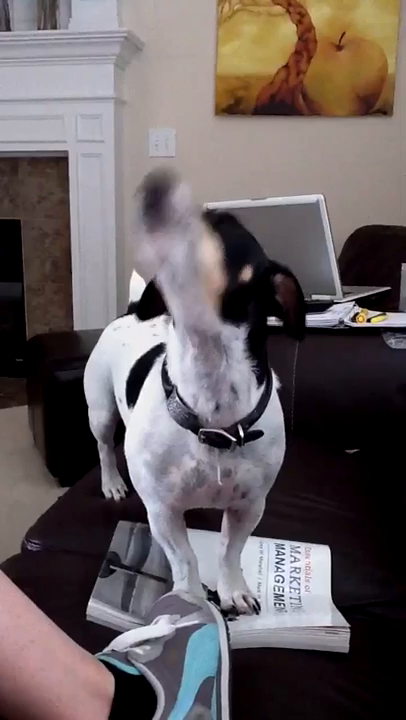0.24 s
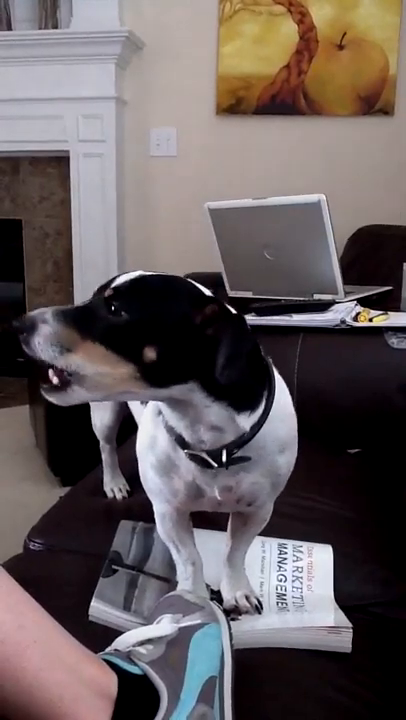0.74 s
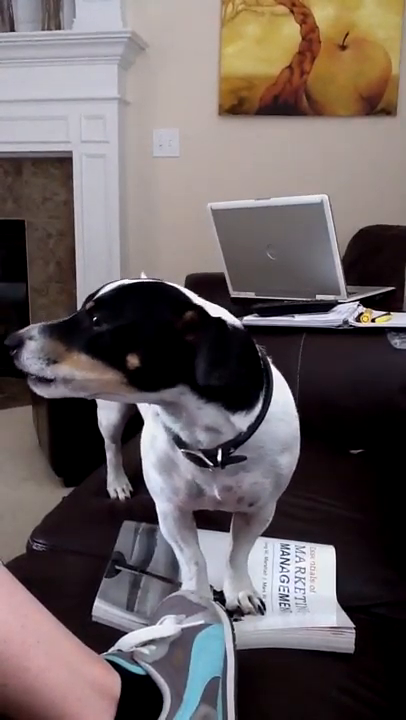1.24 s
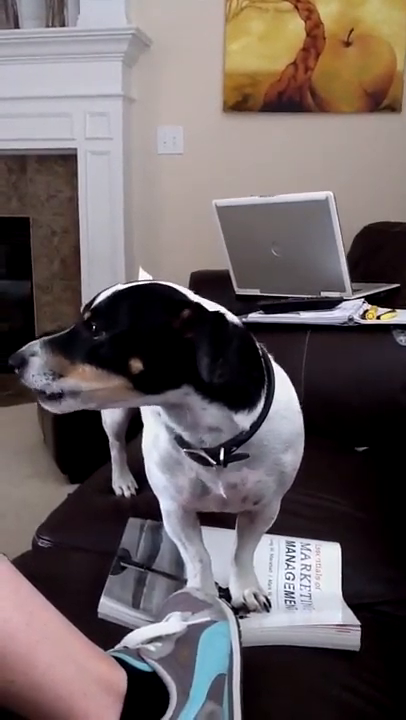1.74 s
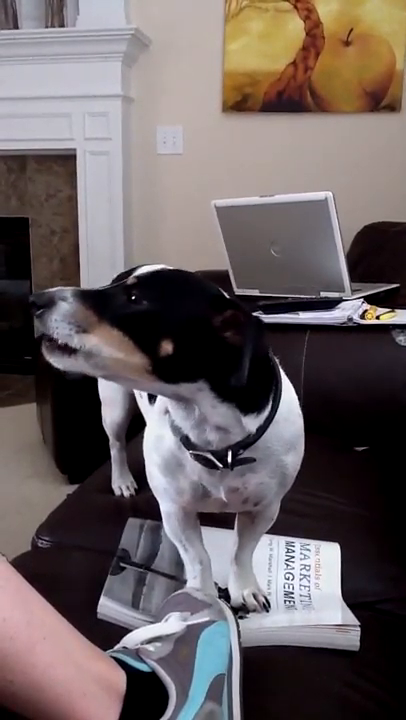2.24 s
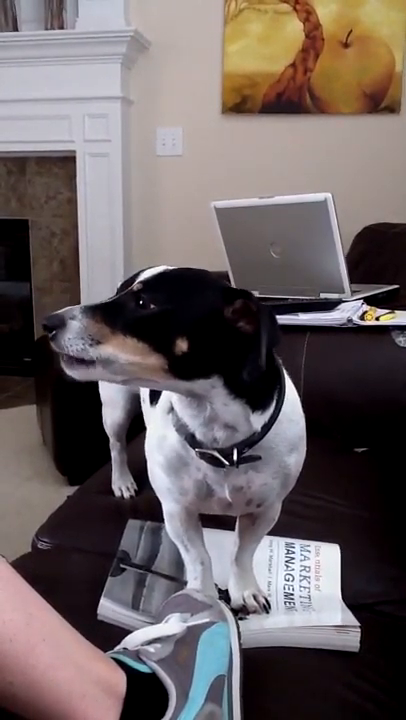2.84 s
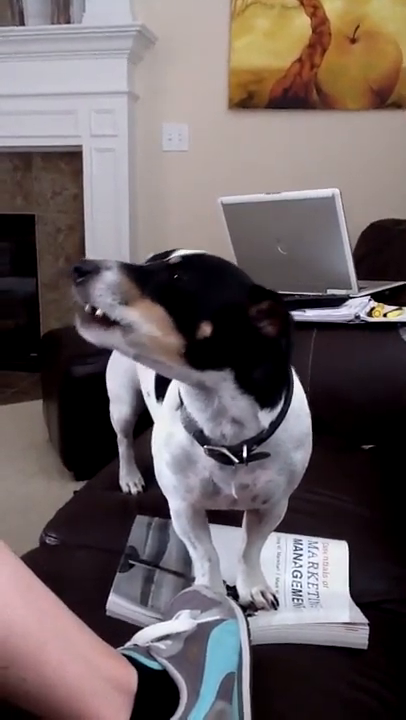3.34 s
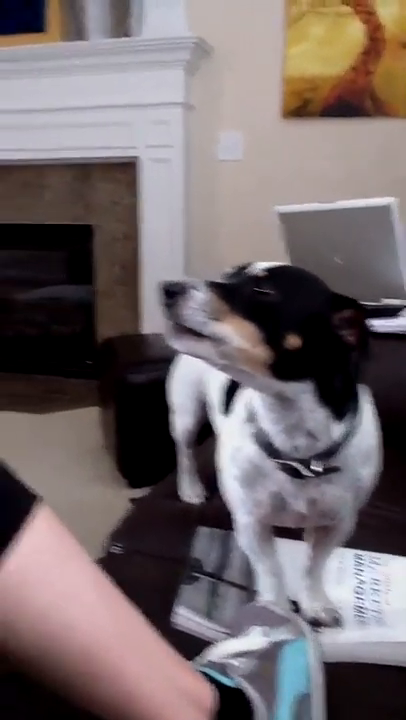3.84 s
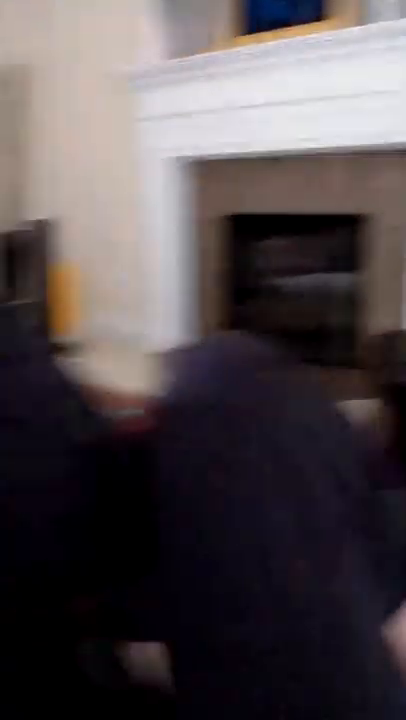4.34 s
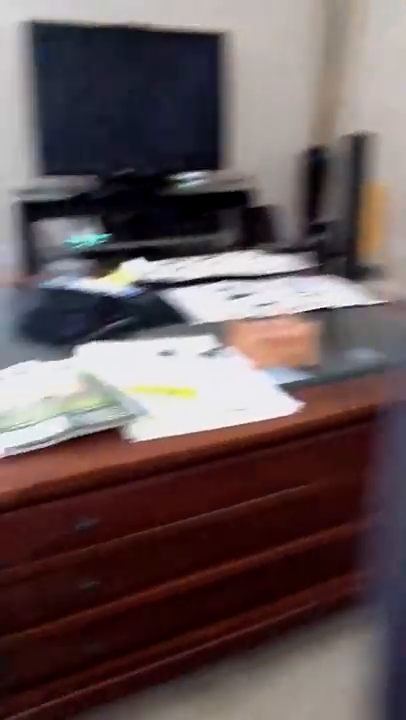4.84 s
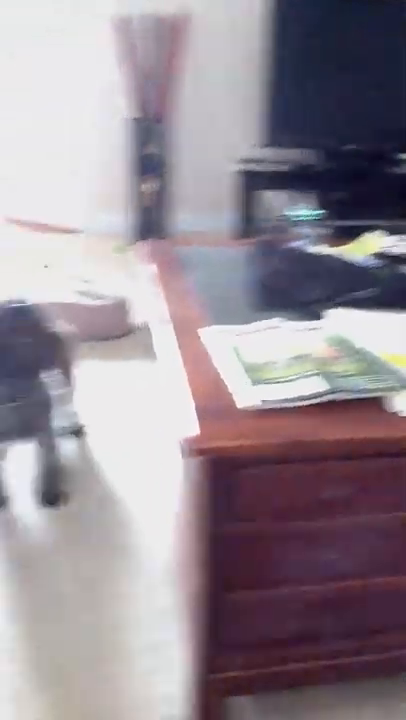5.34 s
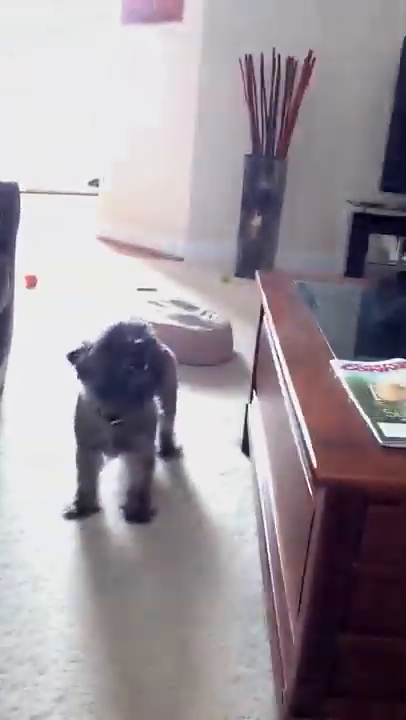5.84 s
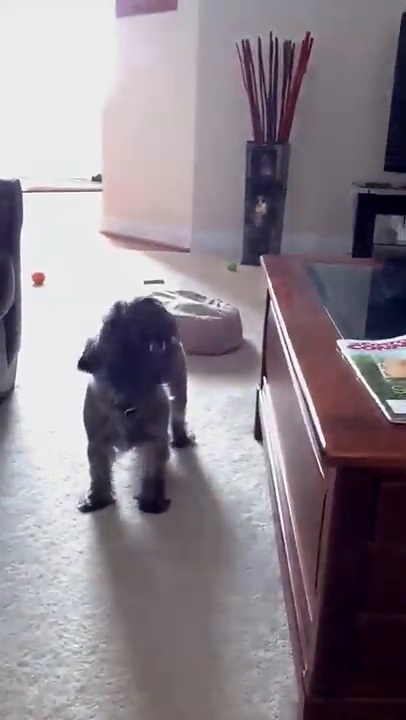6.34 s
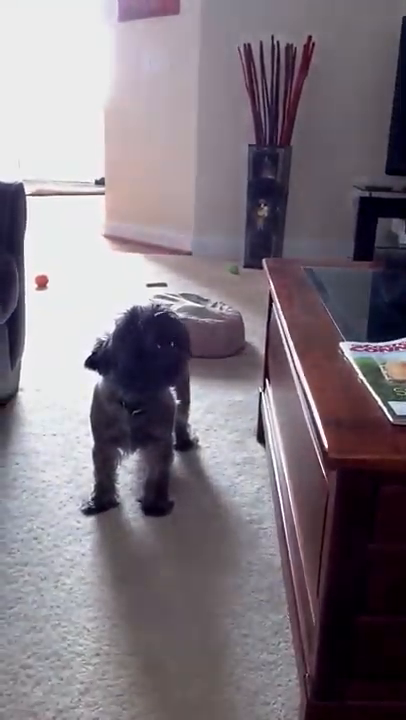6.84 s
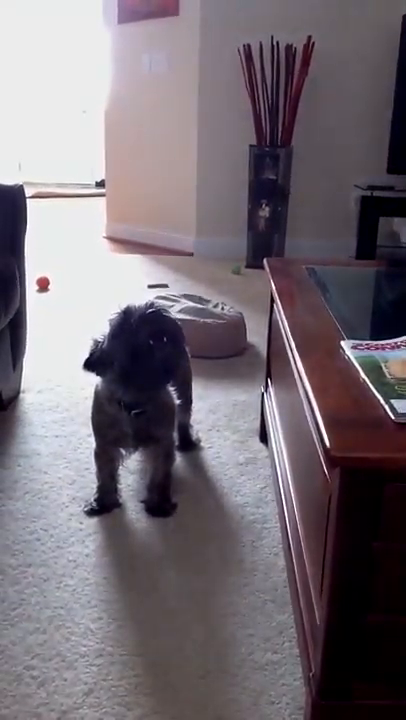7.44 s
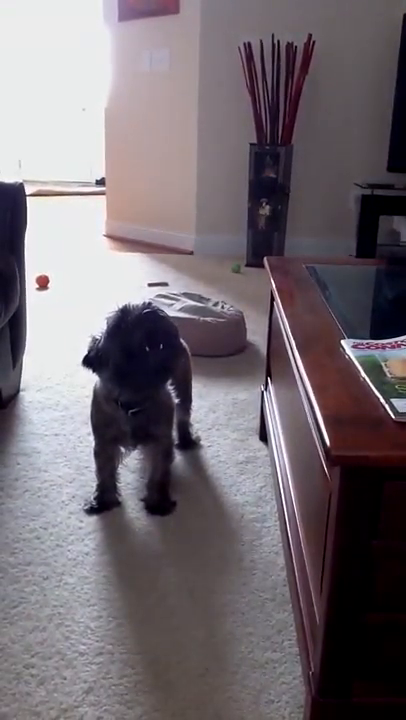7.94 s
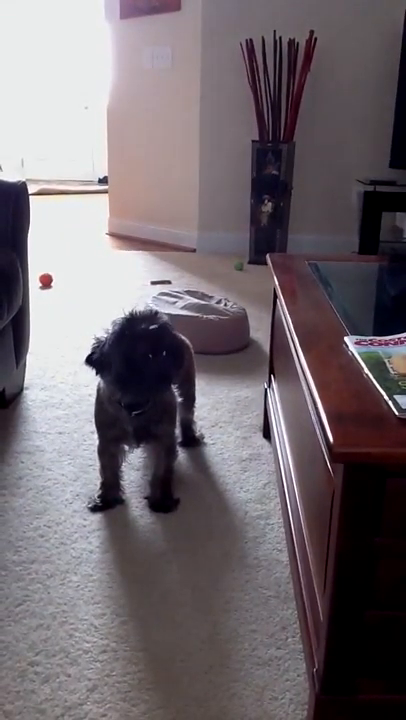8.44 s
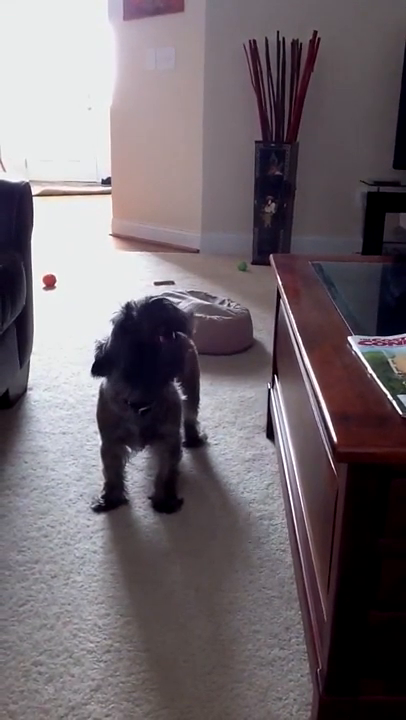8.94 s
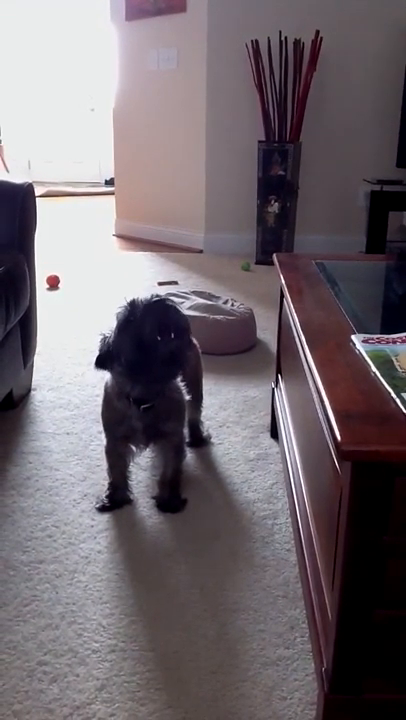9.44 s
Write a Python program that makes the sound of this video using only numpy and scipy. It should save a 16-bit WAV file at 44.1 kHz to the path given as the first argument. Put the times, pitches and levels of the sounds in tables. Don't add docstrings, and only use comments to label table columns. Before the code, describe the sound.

In a carpeted living room, two small dogs vocalise together, very close and loud. One repeatedly gives a tight high yelp that breaks into a falling, wavering howl. The other squeals into hoarse barks and thin whines, then fires off quick, evenly spaced yips. A short room echo and a faint low hum sit behind them, and the overloaded microphone flattens the peaks.

```python
import sys
import numpy as np
from scipy import signal
from scipy.fft import rfft, irfft, next_fast_len
from scipy.io import wavfile
from scipy.ndimage import uniform_filter1d, minimum_filter1d

SR = 44100
rng = np.random.default_rng(int(sys.argv[2]) if len(sys.argv) > 2 else 0)


def decibels_to_gain(level_db):
    exponent = np.asarray(level_db, float) / 20
    return 10 ** exponent


def generate_wav(sig):
    pcm = np.round(np.clip(np.atleast_2d(sig).T, -1, 1) * 32767).astype(np.int16)
    wavfile.write(sys.argv[1], SR, pcm)


N = 426436

FLOOR_DB = -51.5
ROOM_T60_S, TREBLE_T60_S, ROOM_DB = 0.64, 0.51, -7
# pitch in Hz, level in dB, t60 in seconds.
ROOM_MODES = [(977, -17, 0.59), (750, -4, 0.15)]
CUTOFF_HZ = 15400

# frequency in Hz, weight in dB.
HOWL_THROAT = [(400, 3), (1270, 3), (1920, -0.1), (2700, -7), (3850, -22.5), (4500, -34), (6800, -38),
               (7800, -33.5), (9200, -43.5), (10600, -32.5), (15300, -74)]
YIP_THROAT = [(400, 92), (1550, -4), (2450, -1), (3200, -25.5), (4300, -30.5), (5800, -35), (6900, -24.5),
              (8100, -12), (11100, -28.5), (13100, -29), (15300, -31)]
BARK_THROAT = [(400, 30), (1500, 0), (2400, -8), (3200, -12), (4300, -24), (5800, -42), (8000, -37),
               (15300, -50)]
# frequency in Hz, level in dB per Hz.
HOWL_AIR = [(60, -80), (230, -27), (420, -34), (700, -14.5), (1150, -12.5), (1500, -22), (2030, -31.5),
            (3020, -18.5), (4600, -29.5), (7780, -31.5), (15300, -52.5)]
# frequency in Hz, level in dB per Hz.
BARK_AIR = [(230, -37.5), (420, -74), (800, -16), (1200, -4), (1650, -5.5), (2300, -11), (3200, -20.5),
            (5000, -45), (15300, -35.5)]
BLUR_FROM_HZ, BLUR_FULL_HZ = 3500, 4800

# start, loudest moment and end in seconds, pitch in Hz, level in dB.
WHINES = [(0.528, 0.555, 0.65, 689.4, -21.5), (1.765, 1.794, 2.04, 680, -18),
          (2.168, 2.254, 2.39, 647, -17), (2.915, 2.96, 3.29, 698.6, -17), (4.064, 4.316, 4.57, 666, -26.5),
          (5.601, 5.644, 5.76, 697, -16.5), (6.566, 6.665, 6.72, 657, -17.5),
          (9.131, 9.212, 9.3, 698.5, -16.5), (9.64, 9.659, 9.67, 582, -14.5)]
WHINE_SWELL_DB, WHINE_FADE_DB, WHINE_OPENING_DB = 8.5, 10, -14
WHINE_SAG = 0.041

# start and length in seconds, from Hz, to Hz, level in dB.
SQUEALS = [(0.178, 0.061, 704, 847, -12), (1.454, 0.035, 696, 823, -12.5), (2.526, 0.071, 714, 1096, -6),
           (3.698, 0.061, 865, 1153, -3.5), (6.239, .039, 924, 1109, -5), (8.794, .042, 923, 1133, -4.5)]
SQUEAL_SWELL_DB_PER_S, SQUEAL_ABRUPT_S, SQUEAL_ABOVE_DB = 330, .033, -17
# length in seconds, pitch in Hz, level in dB, roughness from 0 to 1,
# level in dB of the glide after it.
RASPS = [(0.085, 1190, -9.5, 0.26, -12), (.085, 1120, -13.5, 0.6, -18), (.085, 1040, -14, 0.33, -12.5),
         (.105, 755, -9.5, 0.38, -20.5), (0.15, 765, -10, 0.34, -26.5), (.1, 770, -8.5, 0.36, -26.5)]
RASP_ARCH, HIGH_RASP_ARCH = .15, .04
MOUTH_HZ, BELOW_DB, ABOVE_DB = 900, 13, -33
GLIDE_S, GLIDE_SETTLES_S, GLIDE_FROM_HZ, GLIDE_TO_HZ, GLIDE_FADE_DB = .19, 0.065, 825, 660, 9

# loudest moment in seconds, top pitch in Hz, level in dB, rise in seconds, mouth opening in dB.
YIPS = [(2.09, 748, -16.5, 0.087, -11.5), (4.654, 764.6, -15, 0.1, -7.5), (4.88, 773.3, -9.5, 0.089, -6),
        (5.101, 767.8, -8, 0.09, -8), (5.312, 789, -3, 0.077, -9.5), (5.527, 747.5, -10.5, 0.086, -18.5),
        (6.906, 751, -12.5, 0.071, -11), (7.124, 775, -9, 0.07, -14), (7.326, 761, -9, 0.079, -11.5),
        (7.527, 771.5, -9.5, 0.084, -10), (7.746, 762.4, -9, 0.091, -10), (7.945, 731, -12.5, 0.082, -11),
        (8.185, 762, -9, 0.055, -14.5), (9.475, 803, -8, 0.069, -8.5)]
HOARSE_YIPS = [(5.8, 807.4, -10.5, 0.075, -11.5), (8.42, 798.5, -11.5, 0.071, -9.5)]

# start in seconds, top pitch in Hz, level in dB,
# strain from 0 to 1, mouth opening of the fall after it (overtones over the lowest tone) in dB.
YELPS = [(0.635, 1143, -6.5, 0.13, 9.5), (1.829, 967.6, -4.5, 0.11, 12), (3.012, 1083, -4.5, 0.1, 12),
         (4.149, 1058, -7.5, 0.19, 19.5), (5.522, 953.4, -6.5, 0.11, 12), (6.655, 1011, -7, 0.1, 13),
         (7.923, 1086, -9.5, 0.07, 13), (9.198, 1004, -8.5, 0.07, 13.5)]
# share of its length, level in dB,
# mouth opening in dB.
YELP_ARC = [
    (0, -10, 5),
    (.15, -3, 4),
    (.31, 0, -13),
    (.56, -4, -12),
    (.87, 1, -20),
]
YELP_START_HZ, YELP_CLIMB_HZ, YELP_SAG_HZ, YELP_KNEE_HZ = 614, 767.8, 909, 964
STRAIN_LASTS, STEADY_STRAIN = .7, .025
# time in seconds, pitch in Hz, level in dB.
EARLY_FALLS = [
    [(0.0, 549.5, -19), (0.165, 516.6, -33), (0.237, 552, -31)],
    [(0.716, 724, -35), (0.758, 660, -18.5), (0.842, 657, -13.5), (1.02, 615.4, -14.5),
     (1.262, 572.7, -15.5), (1.421, 519.4, -21), (1.499, 517, -29)],
    [(1.913, 743.4, -38), (1.949, 647.5, -17.5), (2.024, 634, -16), (2.159, 608, -15.5),
     (2.231, 587.5, -16.5), (2.393, 516.3, -17), (2.456, 439, -22), (2.597, 510, -17.5)],
    [(3.101, 729, -22.5), (3.146, 624, -20), (3.25, 604.6, -16), (3.33, 589.2, -15), (3.536, 519.3, -18),
     (3.575, 517.5, -18), (3.662, 459, -22), (3.746, 455, -23.5)],
    [(4.236, 686, -20), (4.263, 637, -14), (4.315, 408.3, -36.5), (4.48, 462, -25), (4.69, 457, -25),
     (4.85, 466, -25), (5.03, 476.7, -24.5), (5.265, 494, -28.5)],
]
LATE_FALLS = [
    [(5.645, 770, -18.5), (5.747, 658, -19.5), (5.858, 580, -17.5), (5.99, 620, -23), (6.035, 573, -16.5),
     (6.17, 552, -19.5), (6.257, 523, -19.5)],
    [(6.747, 777, -17.5), (6.78, 729, -15.5), (6.933, 676, -18), (7.059, 583, -21), (7.236, 538, -21.5),
     (7.359, 479.4, -24), (7.539, 447, -32.5), (7.599, 411, -42)],
    [(8.031, 736, -17.5), (8.127, 634, -20.5), (8.229, 645, -18), (8.373, 597.7, -18), (8.514, 550, -22),
     (8.649, 496, -28.5), (8.757, 488, -29.5)],
    [(9.279, 699, -19), (9.336, 626, -19.5), (9.411, 634.7, -14.5), (9.582, 527, -28), (9.663, 570.6, -25)],
]
FIRST_OPENING_DB = -15
# time in seconds, pitch rise in %, width in seconds.
PUSHES = [(0.801, 8.8, 0.015), (0.873, 2.8, 0.02), (1.126, 8.6, .06), (1.338, 6, .03), (2.057, 6.1, .02),
          (2.282, 8.2, .035), (3.205, 4.9, .015), (3.295, 5, .015), (3.421, 9.3, .05), (3.603, 9.9, .018),
          (4.434, 26.2, .03), (4.533, 9.8, .022), (4.609, 4.55, .04), (4.739, 12.2, .022), (4.811, 6, .022),
          (4.901, 22, .022), (4.953, 18, .035), (5.101, 3.6, .03), (5.205, 10, .025), (8.417, 13.8, .025),
          (8.569, 17, .03), (8.699, 11.6, .025), (9.638, 18, .028)]
PUSH_DB, PUSH_CLOSES_DB = 0.4844, 0.5


def rms_one(x):
    return x / np.sqrt(np.mean(x ** 2) + 1e-20)


def at_hz(points, hz):
    points = np.array(points)
    return np.interp(np.log(hz), np.log(points[:, 0]), points[:, 1])


def drift(size, rate_hz):
    r = np.exp(-2 * np.pi * rate_hz / SR)
    wander = signal.lfilter([1], [1, -2 * r, r * r], rng.standard_normal(size + 4000))
    return rms_one(wander[4000:])


def coloured(size, spectrum):
    hz = np.maximum(np.fft.rfftfreq(size, 1 / SR), 20)
    white = rfft(rng.standard_normal(size))
    return rms_one(irfft(white * decibels_to_gain(at_hz(spectrum, hz)), size))


def hum(size):
    spectrum = [(30, -56), (150, -8.0), (400, -23), (3000, -16), (15000, -35)]
    return decibels_to_gain(FLOOR_DB) * coloured(size, spectrum)[:N]


def room(x):
    t = np.arange(int(.8 * SR)) / SR
    noise = rng.standard_normal(len(t)) * np.clip((t - .006) / 0.0069, 0, 1)
    low = signal.sosfilt(signal.butter(2, 3500.0, fs=SR, output="sos"), noise)
    tail = low * decibels_to_gain(-60 * t / ROOM_T60_S) + (noise - low) * decibels_to_gain(-60 * t / TREBLE_T60_S)
    tail /= np.sqrt(np.sum(tail ** 2))
    for hz, level_db, t60 in ROOM_MODES:
        tail += decibels_to_gain(level_db - 38.0 - 60 * t / t60) * np.sin(2 * np.pi * hz * t)
    return decibels_to_gain(ROOM_DB) * signal.fftconvolve(x, tail)[:N]


def call(rows, throat, air, tremor, strain_db=0, blur=0):
    s, hz, level_db, open_db, rough = np.transpose(rows)
    start, stop = int(s[0] * SR), min(int((s[-1] + 0.031) * SR), N)
    t, size = np.arange(start, stop) / SR, stop - start
    rough = np.clip(rough, 0, 1)
    hz, level_db, open_db, rough = (np.interp(t, s, c) for c in (hz, level_db, open_db, rough))
    hz = uniform_filter1d(hz, size=300, mode="nearest")
    hz = hz * (1 + tremor * drift(size, 13.93) + 0.06 * rough * drift(size, 179.0))
    phase = 2 * np.pi * (np.cumsum(hz) / SR + rng.random())

    k = np.arange(2, 32)[:, None]
    overtone_hz = k * hz[::32]
    brighter_db = strain_db * rough[::32] * np.clip(np.log2(overtone_hz / 1600), 0, 1.7)
    weights = decibels_to_gain(at_hz(throat, overtone_hz) + brighter_db) * (overtone_hz < CUTOFF_HZ)
    weights /= np.sqrt(np.sum(weights[:3] ** 2, axis=0))
    weights *= decibels_to_gain(np.minimum(1.5 + 0.4 * k, 5.0) * [drift(len(w), 340.0) for w in weights])
    torn = blur * np.clip((overtone_hz - BLUR_FROM_HZ) / (BLUR_FULL_HZ - BLUR_FROM_HZ), 0, 1)
    weights *= 1 - torn + torn * [drift(len(w), 2700.0) for w in weights]
    overtones = sum(np.repeat(w, 32)[:size] * np.sin(n * phase + n * n * .4)
                    for n, w in zip(k[:, 0], weights))

    opening = decibels_to_gain(open_db)
    tone = np.sqrt(2) * (np.sin(phase) + opening * overtones) / np.sqrt(1 + opening ** 2)
    tone *= 1 + 0.71 * rough ** 2 * np.sin(phase / 2) + (0.075 + 0.8 * rough) * drift(size, 45.0)
    puffs = air[start:stop] * (1 + 0.09 * np.sin(phase))
    fade_in = np.clip((t - s[0]) / 0.0032, 0, 1)
    fade_out = np.clip(1 - (t - s[-1]) / 0.022, 0, 1) ** 2
    voice = np.sqrt(1 - rough / 2) * tone + 2.5 * rough * puffs
    out = np.zeros(N)
    out[start:stop] = decibels_to_gain(level_db) * (fade_in * fade_out) * voice
    return out


def whine(start, loudest, end, hz, level_db):
    return [(start, hz * (1 - WHINE_SAG / 2), level_db - WHINE_SWELL_DB, WHINE_OPENING_DB, .05),
            (loudest, hz, level_db, WHINE_OPENING_DB, .04),
            (end, hz * (1 - WHINE_SAG), level_db - WHINE_FADE_DB, WHINE_OPENING_DB, .04)]


def bark(squeal, rasp):
    s, rise_s, from_hz, to_hz, level_db = squeal
    rasp_s, rasp_hz, rasp_db, rough, glide_db = rasp
    u = np.linspace(0, 1, num=9)

    swell_db = SQUEAL_SWELL_DB_PER_S * (rise_s - SQUEAL_ABRUPT_S) * (1 - u) ** 2
    squeal_open = BELOW_DB * u if to_hz < MOUTH_HZ else SQUEAL_ABOVE_DB + 0 * u
    up = [s + rise_s * u, from_hz + (to_hz - from_hz) * u ** .8, level_db - swell_db,
          squeal_open, 0.065 + 0 * u]

    s = s + rise_s + .004
    arch = np.sin(np.pi * (.12 + .88 * u ** .9))
    arch_share = RASP_ARCH if rasp_hz < MOUTH_HZ else HIGH_RASP_ARCH
    rasp_open = BELOW_DB * (1 + arch) if rasp_hz < MOUTH_HZ else ABOVE_DB + 0 * u
    hoarse = [s + rasp_s * u, rasp_hz * (1 + arch_share * (arch - .5)),
              rasp_db + (glide_db - rasp_db) * u ** 2, rasp_open, rough * (0.72 + 0.4 * u)]

    s = s + rasp_s + .006
    left = np.exp(-GLIDE_S * u / GLIDE_SETTLES_S)
    glide_hz = GLIDE_TO_HZ + (max(rasp_hz, GLIDE_FROM_HZ) - GLIDE_TO_HZ) * left
    down = [s + GLIDE_S * u, glide_hz, glide_db - GLIDE_FADE_DB * u,
            WHINE_OPENING_DB + 0 * u, 0.015 + 0.15 * left]
    return np.hstack([up, hoarse, down]).T


def yipper(air):
    out = sum(call(bark(*pair), BARK_THROAT, air, tremor=0.0045) for pair in zip(SQUEALS, RASPS))
    out += sum(call(whine(*row), YIP_THROAT, air, tremor=0.00555) for row in WHINES)
    when = np.linspace(-1.3, .9, num=23)
    top = when - .17
    share = 1.015 - .22 * (1 - np.exp(-(top / np.where(top < 0, .75, .5)) ** 2))
    effort_db = -np.where(when < 0, 13.0, 34.0) * when ** 2
    for yips, rough in ((YIPS, 0.023), (HOARSE_YIPS, 0.18)):
        for s, hz, level_db, rise, open_db in yips:
            opening = open_db - 10.6 * top ** 2
            rows = np.column_stack([s + when * rise, hz * share, level_db + effort_db,
                                    opening, rough + 0 * when])
            out += call(rows, YIP_THROAT, air, tremor=0.00078)
    return out


def howler(air):
    out = 0
    for yelp, fall in zip([None] + YELPS, EARLY_FALLS + LATE_FALLS):
        knots, hz, level_db = np.transpose(fall)
        s = np.arange(knots[0], knots[-1], .004)
        push = sum(rise * np.exp(-((s - at) / width) ** 2) for at, rise, width in PUSHES)
        opening = (yelp[4] if yelp else FIRST_OPENING_DB) - PUSH_CLOSES_DB * push
        fall_hz = np.interp(s, knots, hz) * (1 + push / 100)
        fall_db = np.interp(s, knots, level_db) + PUSH_DB * push
        rows = np.column_stack([s, fall_hz, fall_db, opening])
        strain = STEADY_STRAIN
        if yelp:
            start, top_hz, yelp_db, yelp_strain, _ = yelp
            length = s[0] - start
            share, arc_db, arc_open = np.transpose(YELP_ARC)
            pitch = [YELP_START_HZ, YELP_CLIMB_HZ, min(top_hz, YELP_KNEE_HZ), top_hz, YELP_SAG_HZ]
            opener = np.column_stack([start + share * length, pitch, yelp_db + arc_db, arc_open])
            rows = np.vstack([opener, rows])
            strain = strain + yelp_strain * np.exp(-((rows[:, 0] - start) / (STRAIN_LASTS * length)) ** 2)
        rows = np.column_stack([rows, strain + 0 * rows[:, 0]])
        out = out + call(rows, HOWL_THROAT, air, tremor=0.00633, strain_db=65, blur=.55)
    return out


def scene():
    size = next_fast_len(N)
    dogs = howler(coloured(size, HOWL_AIR)) + yipper(coloured(size, BARK_AIR))
    return (dogs + room(dogs) + hum(size))[None]


def roll_off(x):
    return signal.sosfilt(signal.butter(12, 15410, fs=SR, output="sos"), x)


def record(dry):
    envelope = -minimum_filter1d(-np.abs(dry), size=200)
    gain = uniform_filter1d(np.minimum(1, 1.01 / (envelope + 1e-9)), size=200)
    held = dry * gain
    held = held + 0.015 * held ** 2
    held = signal.sosfilt(signal.butter(2, 110.0, "high", fs=SR, output="sos"), held)
    cut = signal.sosfilt(signal.cheby2(16, 60, CUTOFF_HZ + 250, fs=SR, output="sos"), held)
    return roll_off(cut)


dry = scene()
out = record(dry)
generate_wav(out)
```